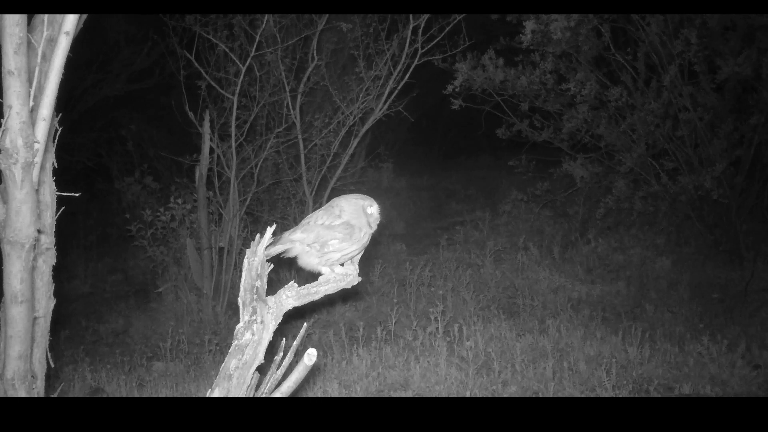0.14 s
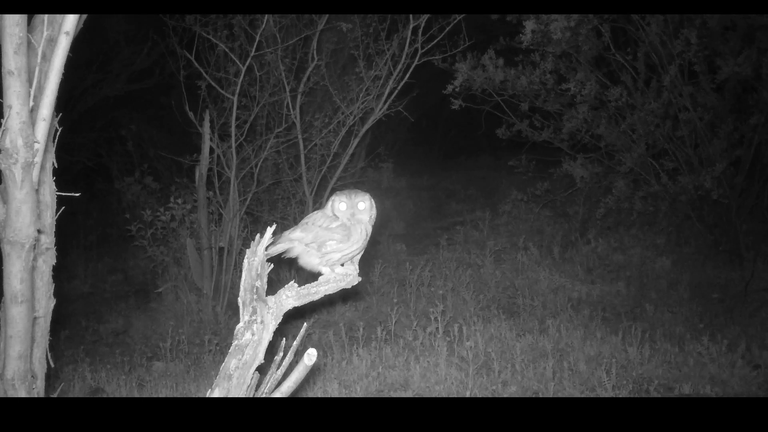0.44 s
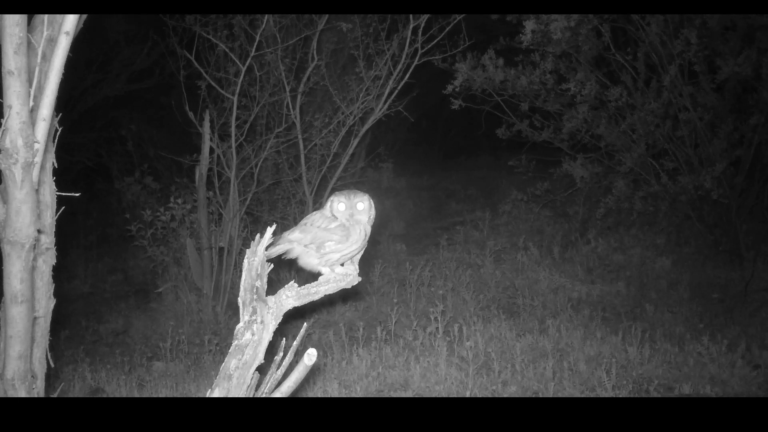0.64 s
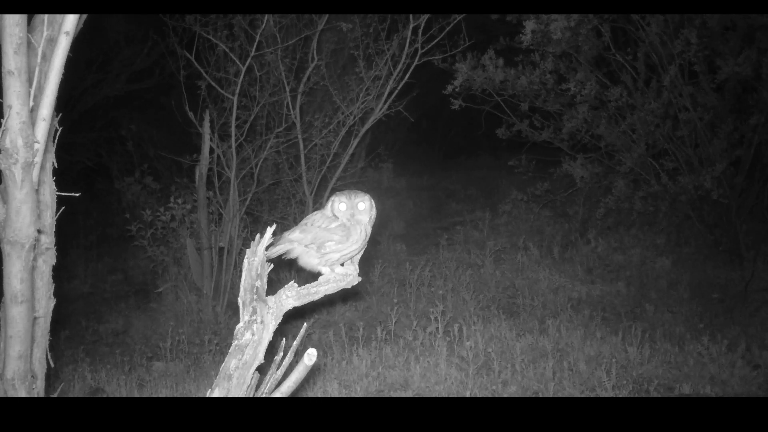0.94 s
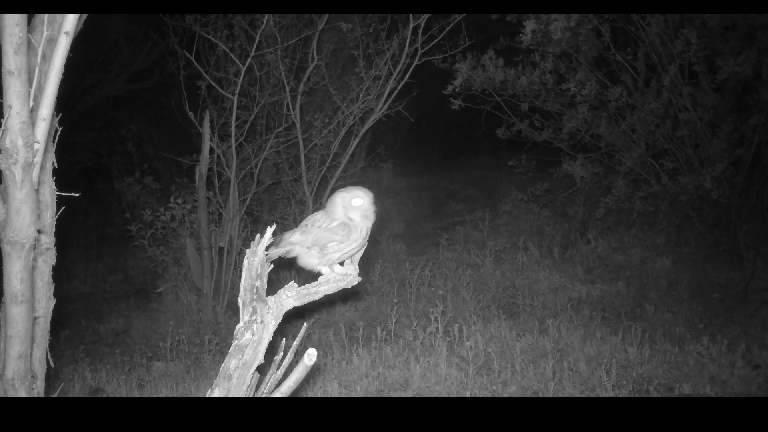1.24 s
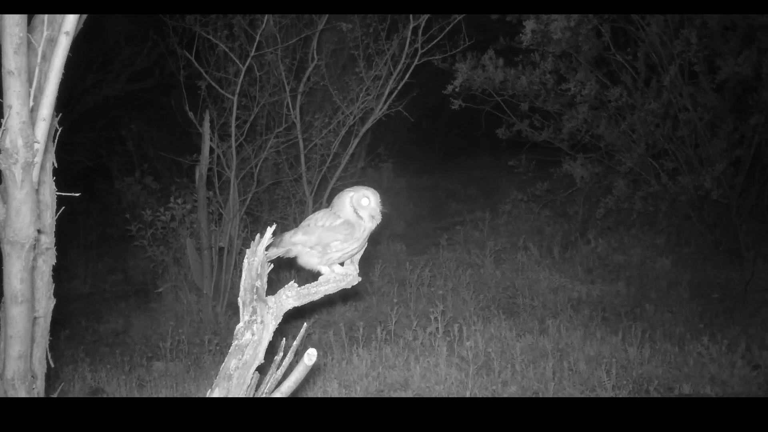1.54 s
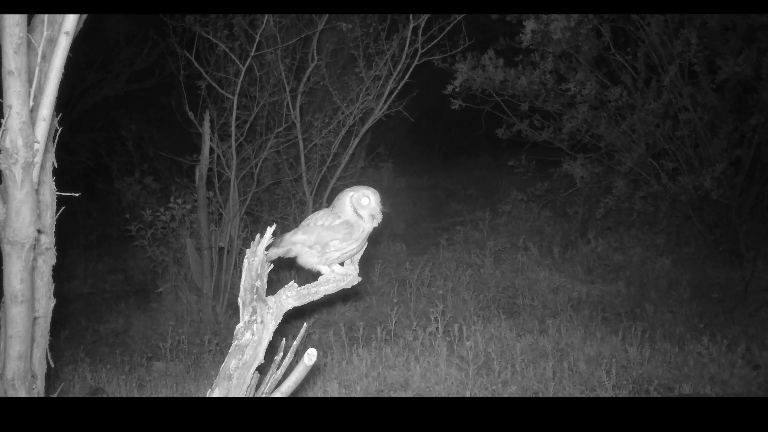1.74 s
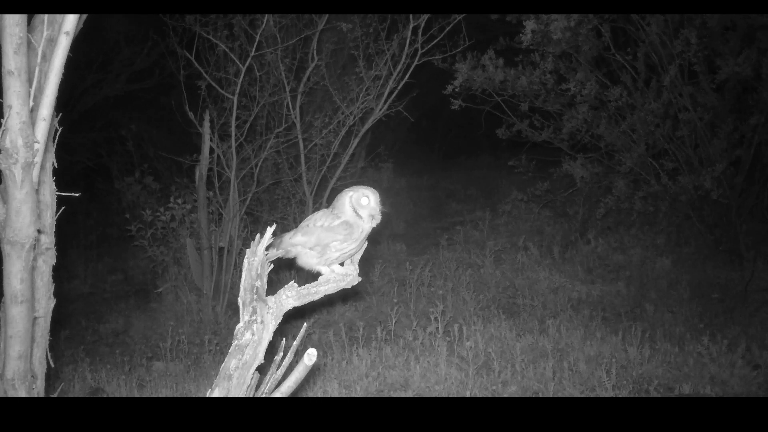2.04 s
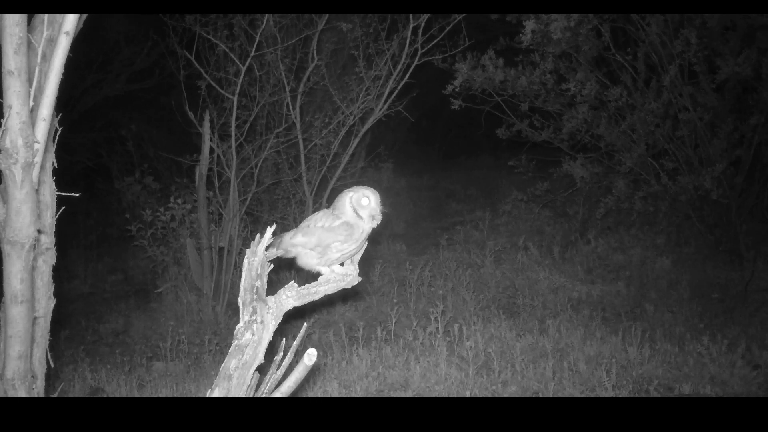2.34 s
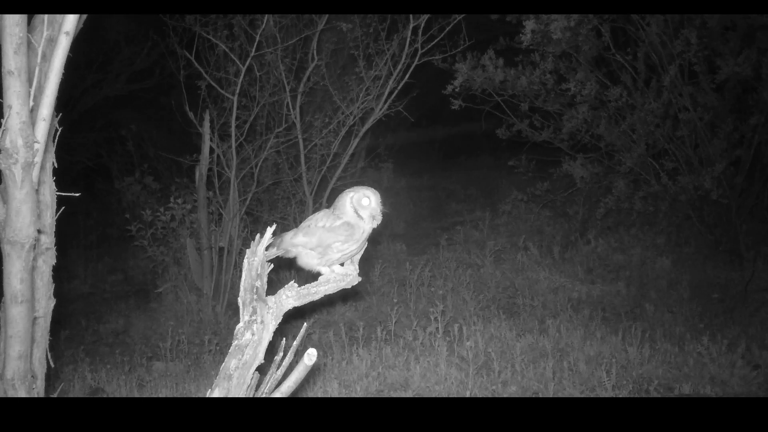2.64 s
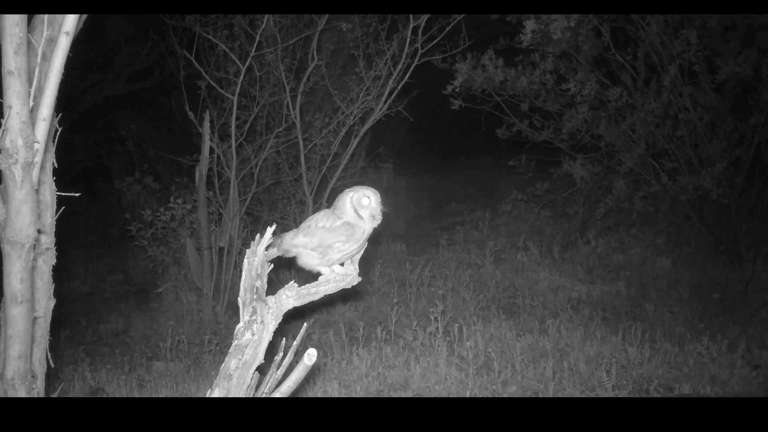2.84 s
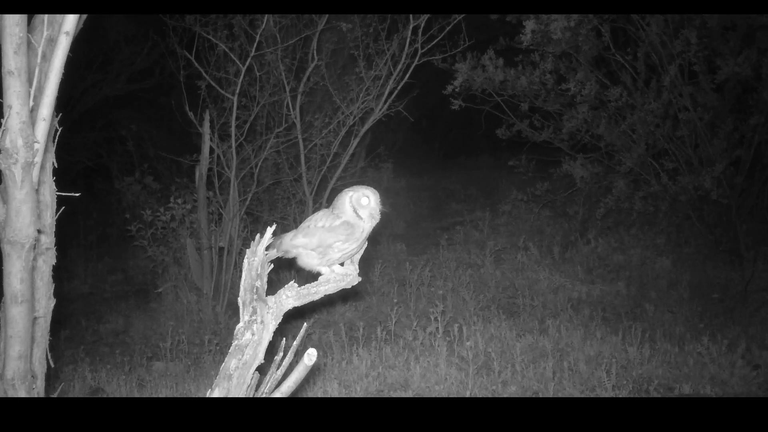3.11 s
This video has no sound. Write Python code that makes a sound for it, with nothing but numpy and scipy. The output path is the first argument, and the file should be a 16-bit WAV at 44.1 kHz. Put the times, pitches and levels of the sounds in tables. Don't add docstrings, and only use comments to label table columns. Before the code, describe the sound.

An owl's rapid soft hoots start weakly, pause briefly, then build into a long even trill that falls off, overlapping another owl's lower flat notes; open woodland night, noisy stereo microphone, faint insects.

```python
import sys
import numpy as np
from scipy import signal
from scipy.fft import rfft, irfft, next_fast_len
from scipy.io import wavfile
from scipy.ndimage import uniform_filter1d

SR = 44100
rng = np.random.default_rng(int(sys.argv[2]) if len(sys.argv) > 2 else 0)


def magnitude_from_level(level_db):
    exponent = np.asarray(level_db, float) / 20
    return 10 ** exponent


def to_wav(sig):
    pcm = np.clip(np.atleast_2d(sig), -1, 1) * 32767
    pcm = np.round(pcm).astype(np.int16)
    wavfile.write(sys.argv[1], SR, pcm.T)


N = 144207

# f/Hz, level/dB
HISS_SPECTRUM = [(3, -4), (18, -0.5), (40, -3.5), (130, -14), (400, -23.5), (1500, -30), (10000, -36),
                 (14500, -35.5)]
# f/Hz, left-right likeness/1
HISS_LIKENESS = [(40, 0.17), (250, 0.25), (1000, 0.47), (12000, 0.38)]
# middle t/s, width/s, level/dB
INSECT_SWELLS = [
    (.29, .04, -79),
    (.54, 0.033, -75),
    (.9, .07, -80),
    (1.43, .025, -69.5),
    (1.97, .03, -79),
    (2.49, .03, -75),
    (2.65, .03, -71),
    (3.26, 0.044, -68),
]
# middle t/s, length/s, peak level/dB, pitch f/Hz
FAR_BOUT_1 = [(.047, 0.036, -59.5, 514), (.125, 0.021, -52, 525), (.193, .045, -54, 528),
              (.252, 0.027, -53.5, 535), (.315, 0.035, -55, 538), (.37, .038, -56, 524),
              (.427, .038, -56, 522), (.485, 0.037, -58, 516), (.543, 0.027, -56.5, 524),
              (.6, 0.028, -55, 526), (.657, 0.021, -54.5, 519), (.715, 0.035, -60, 511),
              (.802, 0.033, -65.5, 516)]
# middle t/s, length/s, peak level/dB, pitch f/Hz
FAR_BOUT_2 = [(1.026, 0.054, -54, 541), (1.123, 0.056, -53.5, 547), (1.212, 0.042, -52, 552),
              (1.308, 0.053, -55, 540), (1.409, 0.047, -52.5, 540), (1.497, 0.045, -53.5, 539),
              (1.588, 0.048, -52.5, 539), (1.676, .048, -56, 543), (1.764, 0.037, -54, 538),
              (1.835, 0.036, -54.5, 535), (1.888, 0.049, -58.5, 507), (1.947, 0.038, -59.5, 494)]
# start t/s, length/s, peak level/dB, crest f/Hz, set-in depth under the crest/1
NEAR_HOOTS = [(0.892, 0.047, -52.5, 735, 0.06), (0.992, 0.035, -45.5, 828, 0.01),
              (1.068, 0.048, -43.5, 857, 0.15), (1.156, 0.04, -44.5, 830, 0.09),
              (1.242, 0.033, -45, 843, 0.05), (1.323, 0.022, -48.5, 749, 0.04), (1.402, 0.013, -58, 830, 0),
              (1.543, 0.04, -40.5, 850, 0.05), (1.638, 0.046, -38, 877, 0.04),
              (1.737, 0.05, -38.5, 858, 0.06), (1.839, 0.049, -38, 870, 0.06),
              (1.943, 0.049, -37, 880, 0.06), (2.045, 0.044, -37, 864, 0.04),
              (2.146, 0.043, -37, 878, 0.04), (2.244, 0.041, -37.5, 853, 0.04),
              (2.341, 0.036, -36.5, 877, 0.05), (2.432, 0.034, -36, 890, 0.06),
              (2.498, 0.0022, -52, 860, 0.04), (2.513, 0.028, -37, 868, 0.05),
              (2.569, 0.035, -38.5, 859, 0.17), (2.639, 0.035, -39.8, 851, 0.14),
              (2.705, 0.03, -41.7, 809, 0.11), (2.769, 0.033, -44.5, 805, 0.13),
              (2.835, 0.024, -51, 717, 0.05)]


def unit(x):
    return x / np.sqrt(np.mean(x ** 2) + 1e-20)


def along(points, hz):
    f, v = np.transpose(points)
    return np.interp(np.log(hz + 1), np.log(f + 1), v)


def filtered(x, response):
    m = next_fast_len(N + SR // 2)
    spectrum = rfft(x, m) * response(np.fft.rfftfreq(m, 1 / SR))
    return irfft(spectrum, m)[..., :N]


def add_note(voice, start_s, hz, size, octave_db):
    phase = 2 * np.pi * (np.cumsum(hz) / SR + rng.random())
    octave = magnitude_from_level(octave_db) * size / size.max() * np.sin(2 * phase + 1)
    voice[round(start_s * SR):][:len(hz)] += size * (np.sin(phase) + octave)


def hiss():
    level_db, left_db, patchy_db = -52.5, -0.23, 0.1
    z = signal.stft(rng.standard_normal((2, N + 512)), nperseg=512)[2]
    patches = uniform_filter1d(rng.standard_normal(z.shape[1:]), 6, 0)
    patches = uniform_filter1d(patches, 14, 1)
    pair = signal.istft(z * magnitude_from_level(patchy_db * unit(patches)), nperseg=512)[1][:, :N]

    def mid_side(hz):
        angle = np.arccos(np.clip(along(HISS_LIKENESS, hz), -1, 1)) / 2
        return (hz > 2) * magnitude_from_level(along(HISS_SPECTRUM, hz)) * [np.cos(angle), np.sin(angle)]

    mid, side = filtered(pair, mid_side)
    stereo = unit(np.array([mid + side, mid - side]))
    return magnitude_from_level(level_db) * stereo * magnitude_from_level([[left_db], [0]])


def insects():
    centre_hz, width_hz, bed_db, left_db = 6700, 1360, -78, -8
    t = np.arange(N) / SR
    swell = np.full(N, magnitude_from_level(bed_db))
    for middle_s, width_s, db in INSECT_SWELLS:
        swell += magnitude_from_level(db) * np.exp(-((t - middle_s) / width_s) ** 2)
    roughness_db = 2.6 * unit(uniform_filter1d(rng.standard_normal(N), 150))
    scratch = rng.standard_normal(N) * magnitude_from_level(roughness_db)

    def resonance(f):
        damping = 1j * f * width_hz
        return (damping / (centre_hz ** 2 - f * f + damping)) ** 2

    return swell * unit(filtered(scratch, resonance)) * magnitude_from_level([[left_db], [0]])


def far_owl():
    roundness, sag, left_db, left_lag_s = 0.61, 0.04, -6.5, 0.00024
    voice = np.zeros(N)
    for bout, octave_db in ((FAR_BOUT_1, -16), (FAR_BOUT_2, -7.5)):
        for middle_s, length_s, db, hz in bout:
            u = np.linspace(-1, 1, round(length_s * SR))
            pitch_hz = hz * (1 - sag * np.clip(u, 0, 1) ** 2)
            size = magnitude_from_level(db) * np.abs(np.cos(np.pi * u / 2)) ** roundness
            add_note(voice, middle_s - length_s / 2, pitch_hz, size, octave_db)
    left = filtered(voice, lambda hz: np.exp(-2j * np.pi * hz * left_lag_s))
    return np.array([magnitude_from_level(left_db) * left, voice])


def near_hoot(voice, start_s, length_s, db, crest_hz, under):
    snap_s, tail_s = 0.0019, 0.0066
    set_in_db, soft_db, fade_db, fade_bend = 2, 93, 25, 2.43
    scoop, sag, sag_bend = 1.63, 0.39, 1.64
    overshoot, overshoot_s, snaps_under = 0.13, 0.0029, 0.075
    whole_s = length_s + tail_s
    t = np.arange(round(whole_s * SR)) / SR
    crest = 0.36 + 1.3 * under
    before = np.clip(1 - t / whole_s / crest, 0, 1) ** 2
    after = np.clip((t / whole_s - crest) / (1 - crest), 0, 1)

    ends = np.clip(t / snap_s, 0, 1) * np.sqrt(1 - after ** 4)
    loss_db = (set_in_db + soft_db * max(under, 0)) * before + fade_db * after ** fade_bend
    size = ends * magnitude_from_level(db - loss_db)

    sharp = overshoot * np.clip(1 - under / snaps_under, 0, 1) * np.exp(-t / overshoot_s)
    pitch_hz = crest_hz * (1 + sharp - scoop * under * before - sag * after ** sag_bend)
    octave_db = -28 + 0.6 * (db + 37)
    add_note(voice, start_s, pitch_hz, size, octave_db)


def near_owl():
    left_db, echo_db, echo_t60_s, echo_delay_s = -6, -32.5, 0.22, 0.012
    voice = np.zeros(N)
    for hoot in NEAR_HOOTS:
        near_hoot(voice, *hoot)
    t = np.arange(SR // 3) / SR
    tail = rng.standard_normal((2, len(t))) * magnitude_from_level(-60 * t / echo_t60_s) * (t > echo_delay_s)
    echo = signal.fftconvolve(voice[None], tail / np.linalg.norm(tail[0]), axes=1)[:, :N]
    return (voice + magnitude_from_level(echo_db) * echo) * magnitude_from_level([[left_db], [0]])


def scene():
    return hiss() + insects() + far_owl() + near_owl()


def band_limit(x):
    return signal.sosfilt(signal.butter(12, 15170, fs=SR, output="sos"), x)


def record(dry):
    start, end, settle_s = np.array([[-0.0215], [-0.0095]]), np.array([[-0.037], [-0.026]]), 1.8
    offset = end + (start - end) * np.exp(-np.arange(N) / SR / settle_s)
    return band_limit(dry + offset)


dry = scene()
out = record(dry)
to_wav(out)
```